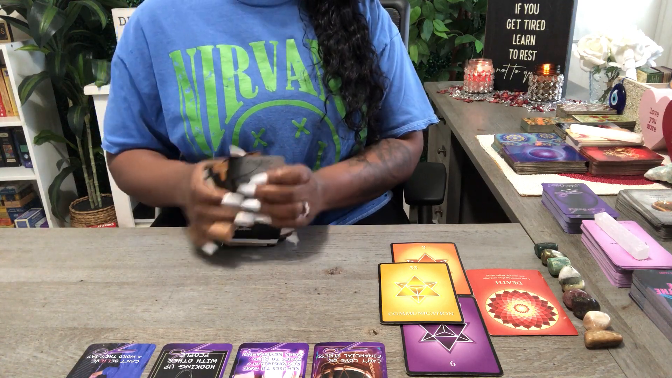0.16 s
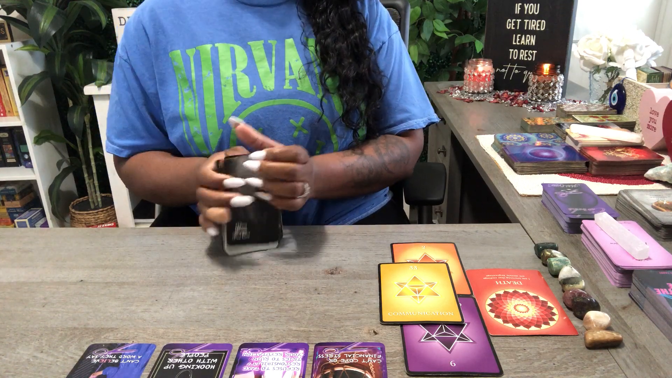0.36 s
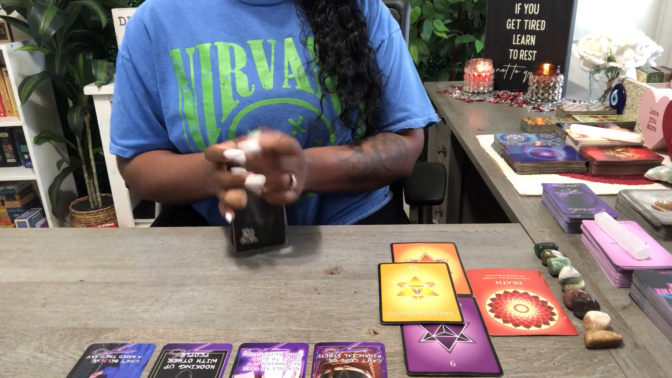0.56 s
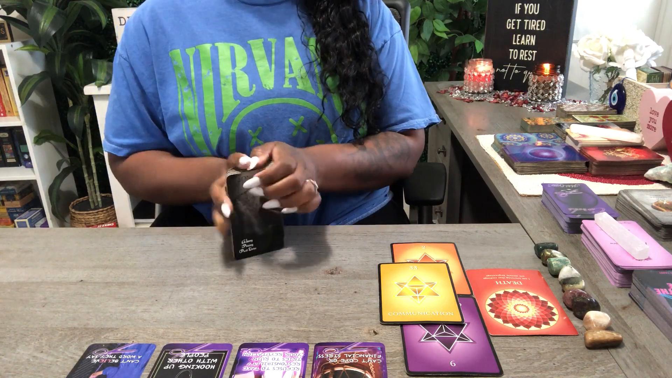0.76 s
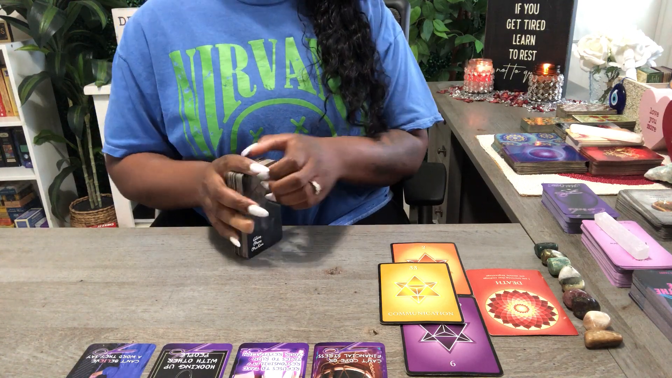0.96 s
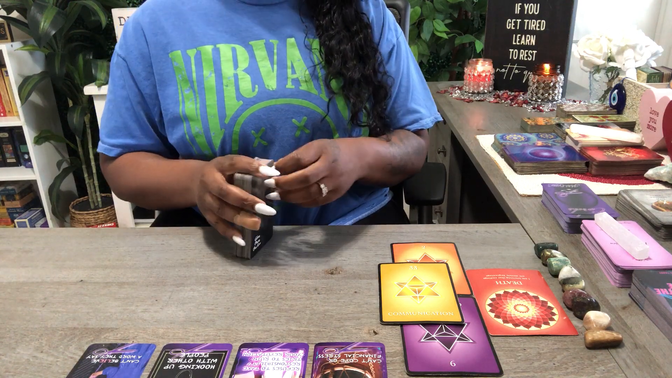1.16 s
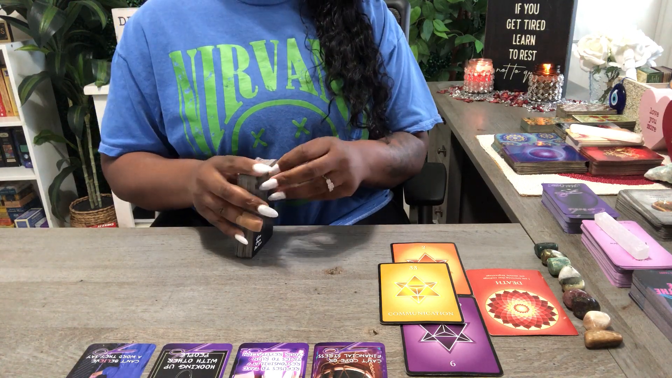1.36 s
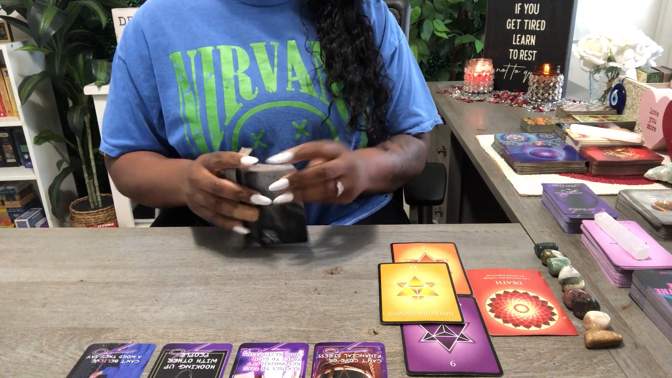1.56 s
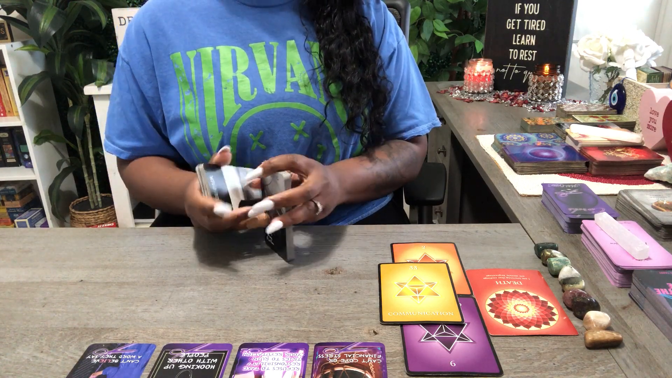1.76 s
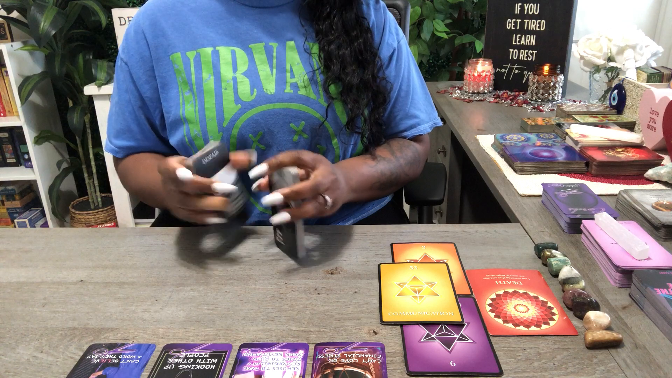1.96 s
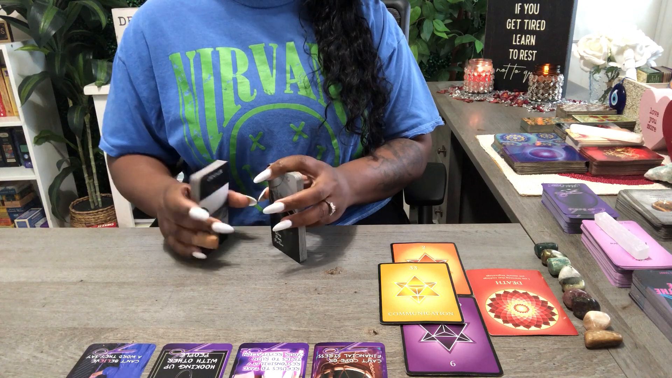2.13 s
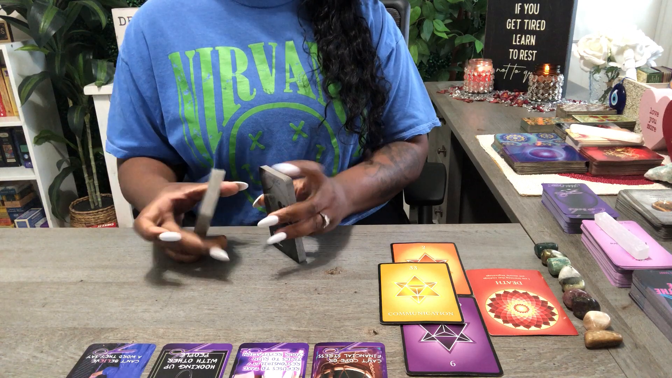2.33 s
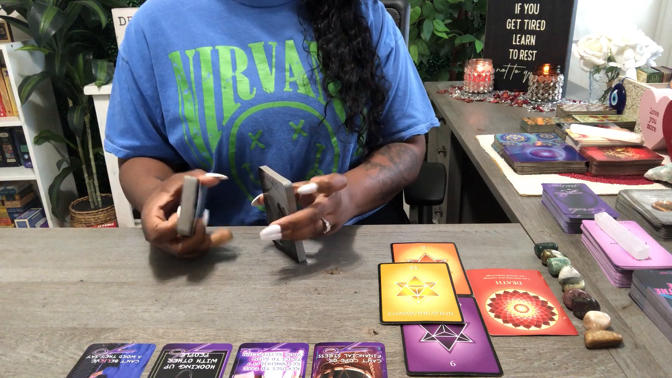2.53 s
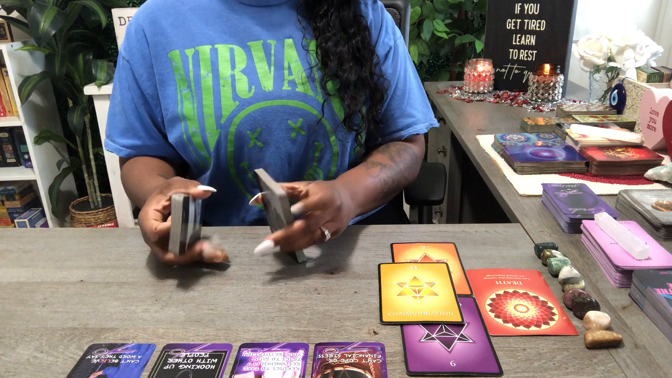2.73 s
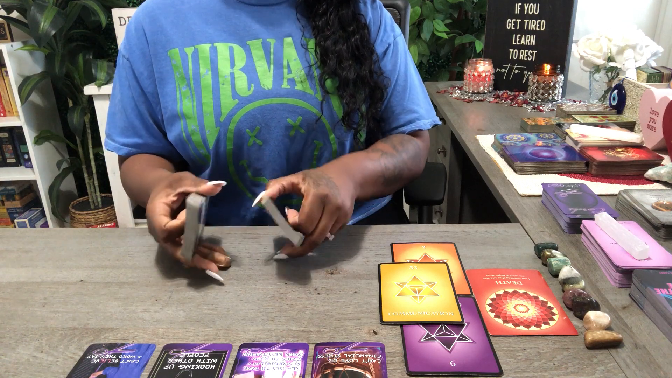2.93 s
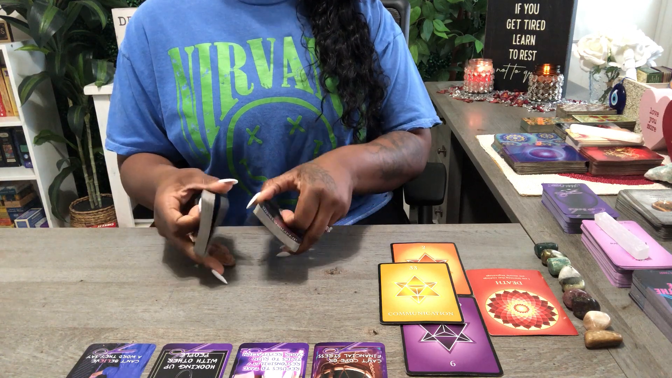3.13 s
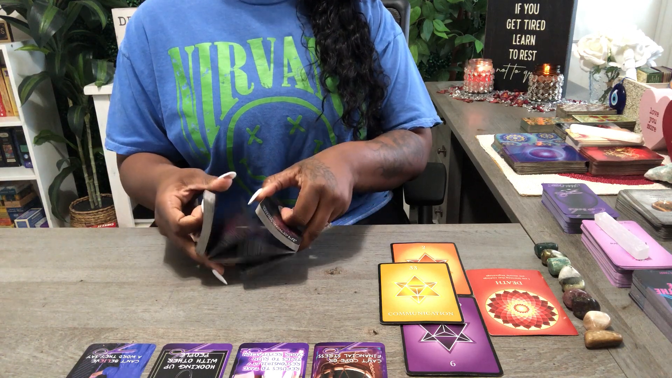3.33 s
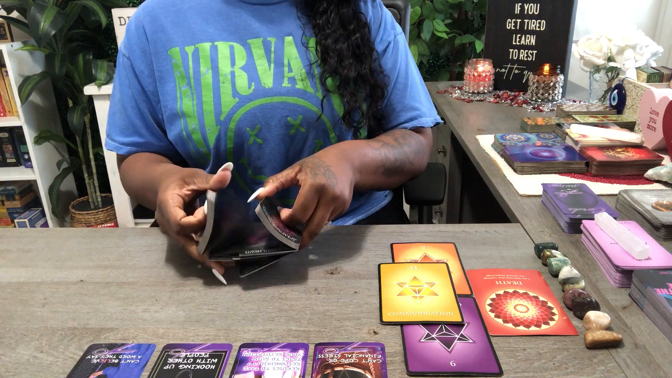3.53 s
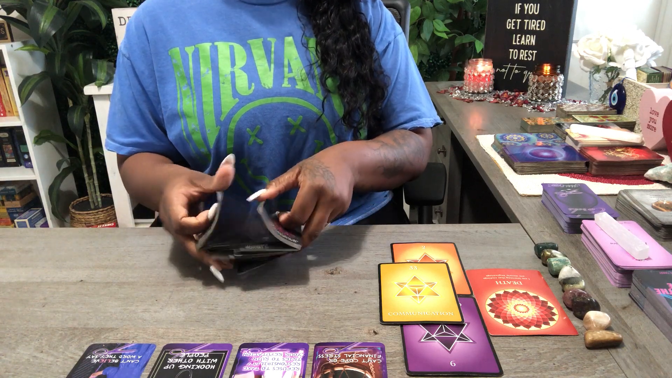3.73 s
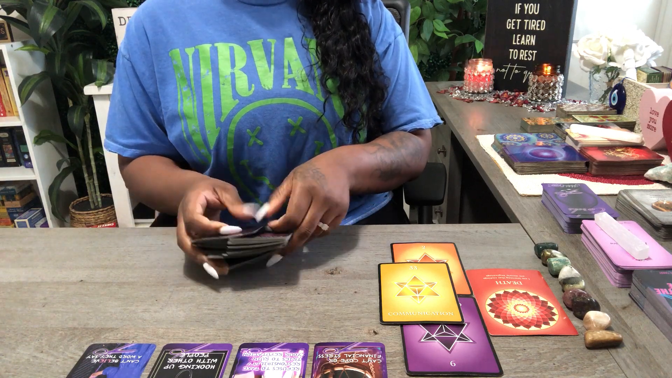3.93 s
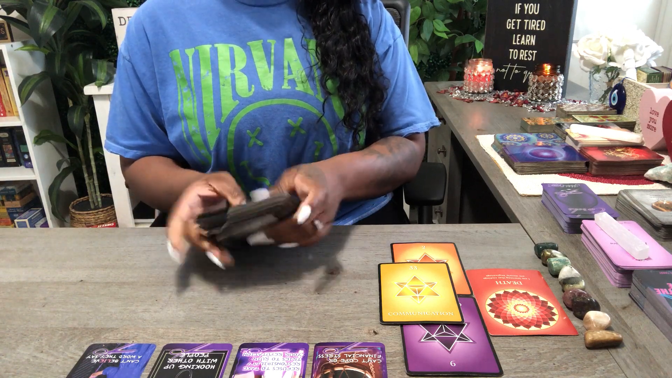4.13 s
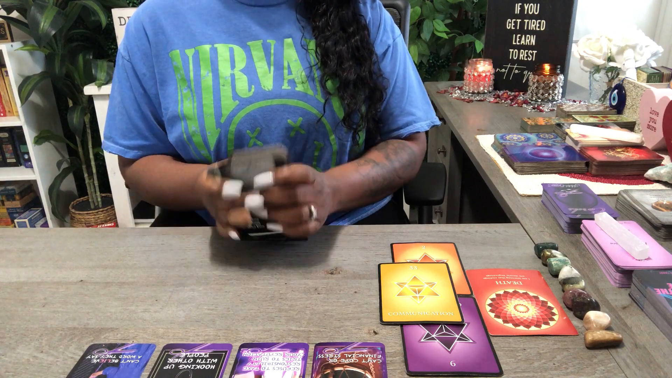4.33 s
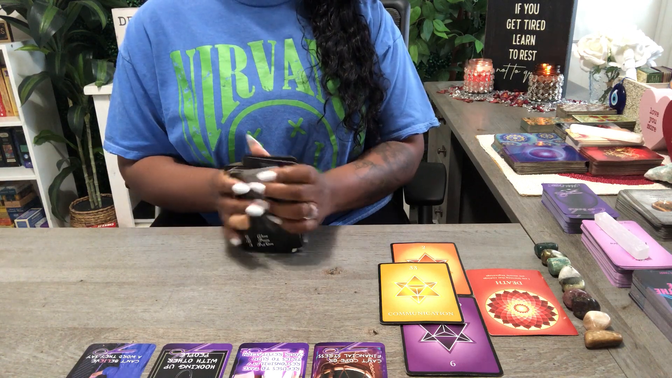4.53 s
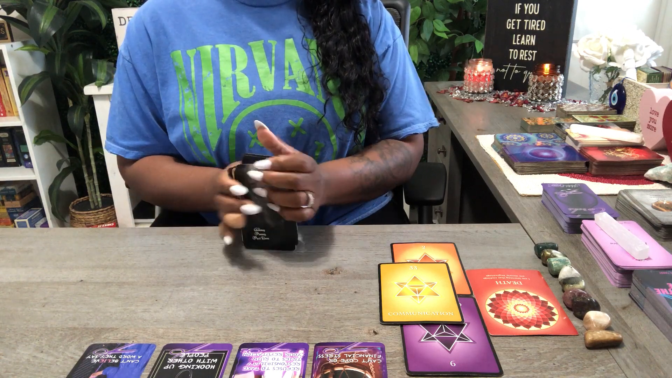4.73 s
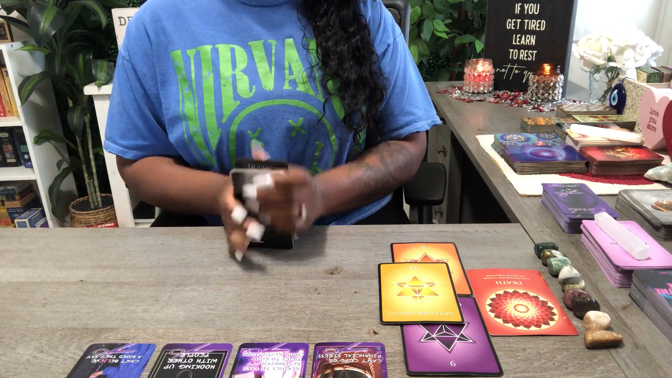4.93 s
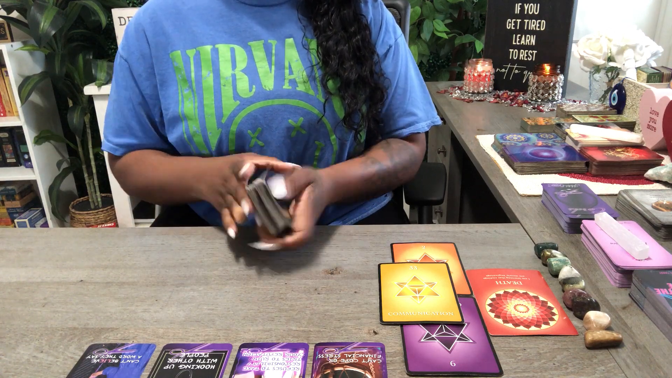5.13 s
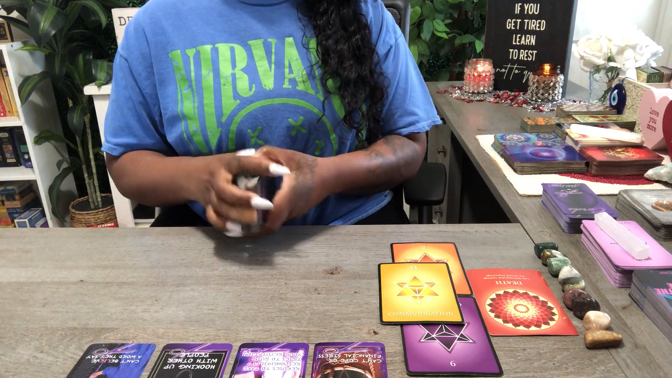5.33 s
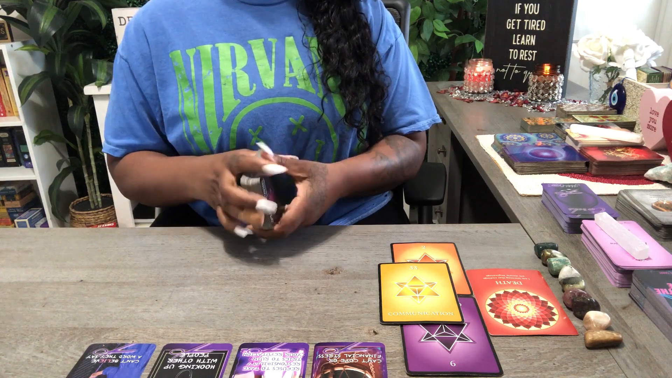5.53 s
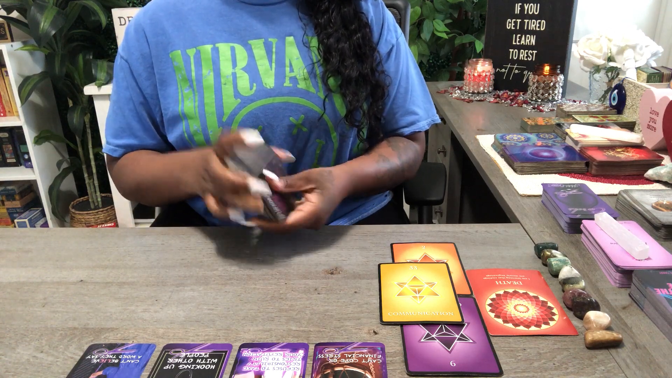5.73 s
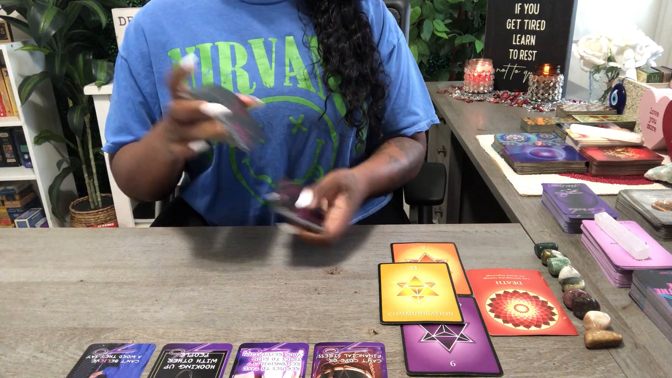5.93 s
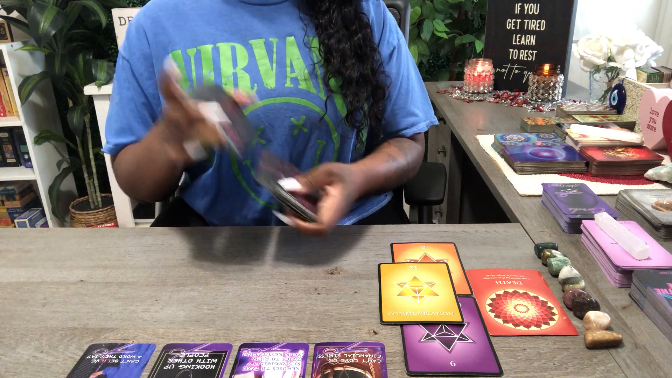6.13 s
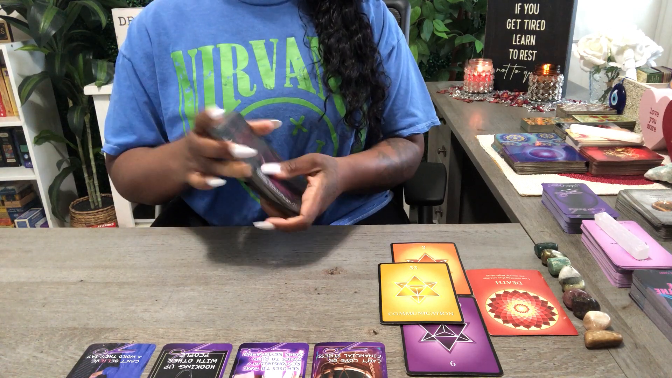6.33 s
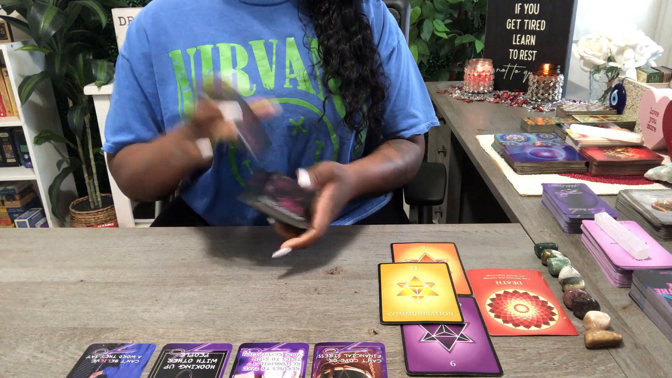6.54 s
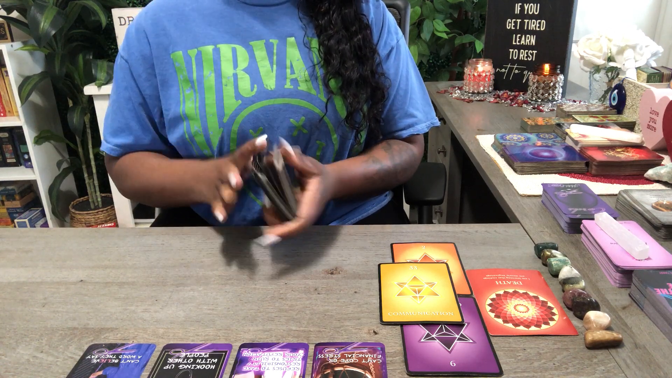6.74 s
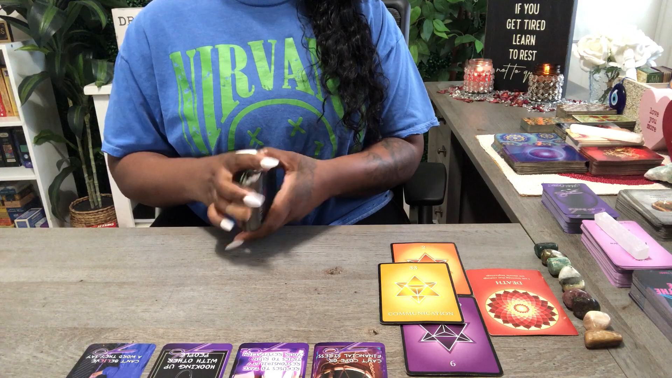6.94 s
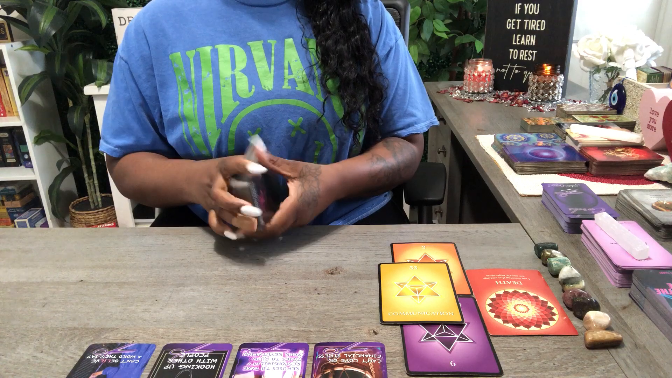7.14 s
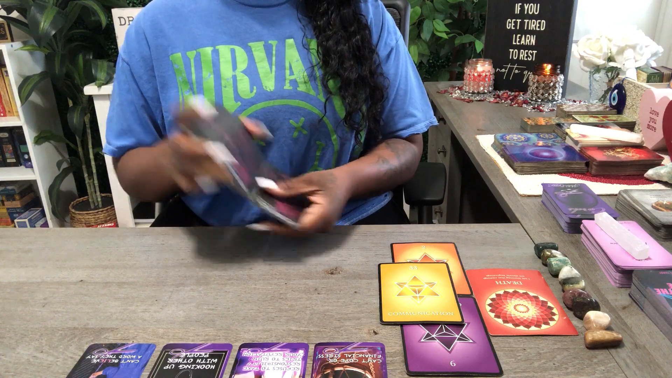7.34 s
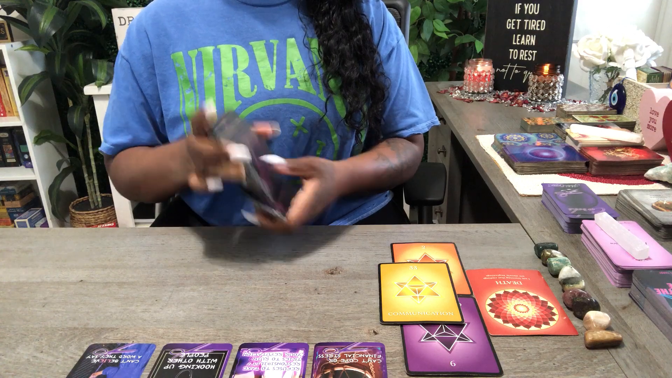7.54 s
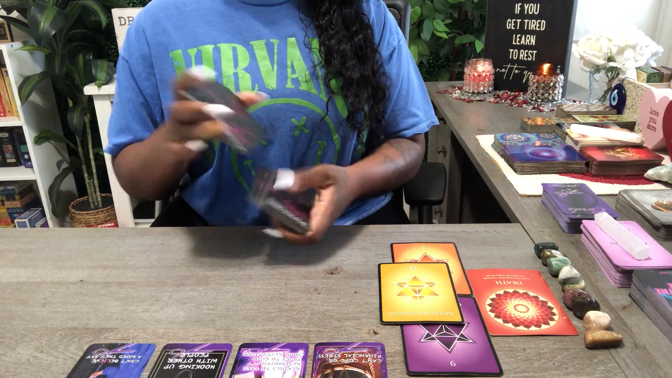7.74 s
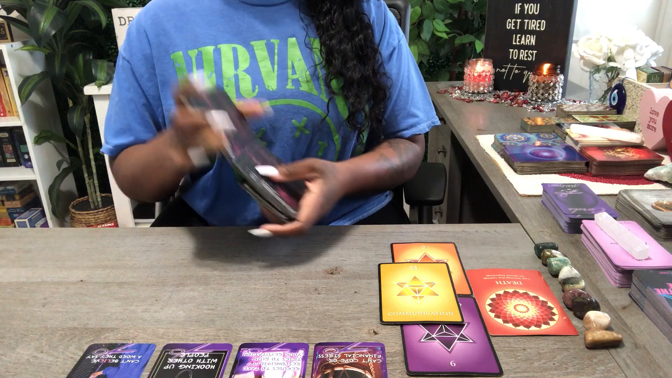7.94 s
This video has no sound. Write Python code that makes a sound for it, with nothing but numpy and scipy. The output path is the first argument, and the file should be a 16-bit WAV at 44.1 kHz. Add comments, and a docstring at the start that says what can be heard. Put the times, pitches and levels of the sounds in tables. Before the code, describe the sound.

A deck of large cards knocks sharply on a wooden table, riffles in a quickening purr, then shuffles overhand in a small room with faint hum.

```python
"""Over a soft rush of air and a faint hum, a deck of large cards is knocked square on a wooden table.
It is cut, riffled, squared again and shuffled overhand. Card edges clack, snap and thump the table top:
sharp blows with a noisy chatter, shaped by the resonances of stack and wood. Single cards flick and slap,
packets slide as grainy filtered noise, and trapped air pops as short decaying sines.
A small live room, made of decaying noise, answers the cards."""
import sys
import numpy as np
from scipy import signal
from scipy.fft import rfft, irfft, next_fast_len
from scipy.io import wavfile
from scipy.ndimage import uniform_filter1d, minimum_filter1d, map_coordinates

SR = 44100
rng = np.random.default_rng(int(sys.argv[2]) if len(sys.argv) > 2 else 0)


def generate_wav(signal):
    """Clip the signal to [-1, 1] and save it as 16-bit WAV at the path in sys.argv[1]."""
    frames = np.transpose(np.atleast_2d(signal))
    scaled = np.clip(frames, -1, 1) * 32767
    pcm = np.round(scaled).astype(np.int16)
    wavfile.write(sys.argv[1], SR, pcm)


N = 356769  # length in samples


def amp(db):
    """Decibels to gain."""
    return 10 ** (np.asarray(db) / 20)


def unit(x):
    """x at rms 1."""
    return x / np.sqrt(np.mean(x ** 2) + 1e-20)


def along(points, hz):
    """(Hz, value) points read on a log frequency axis."""
    f, v = np.transpose(points)
    return np.interp(np.log(hz + 1), np.log(f + 1), v)


def fade(t, t60):
    """A decay of 60 dB in t60 seconds."""
    return np.exp(-np.log(1000) * t / np.maximum(t60, 1e-4))


def wobble(rate, size):
    """A smooth random curve, rate knots a second."""
    knots = rng.standard_normal(int(size * rate / SR) + 4)
    return map_coordinates(knots, [np.arange(size) * rate / SR])


def coloured(x, colour):
    """x through a causal, minimum-phase filter with the given spectrum."""
    size = 2 * next_fast_len(len(x) // 2 + 2048)
    spectrum = amp(along(colour, np.fft.rfftfreq(size, 1 / SR)))
    # folding the cepstrum onto positive time makes the filter minimum-phase
    cepstrum = irfft(np.log(spectrum))
    cepstrum[1:size // 2] *= 2
    cepstrum[size // 2 + 1:] = 0
    return irfft(rfft(x, size) * np.exp(rfft(cepstrum)))[:len(x)]


def resonant(colour, modes):
    """A colour lifted around each (Hz, half width Hz, dB) resonance."""
    hz = np.geomspace(60, SR / 2, 500)
    lift = sum(db / (1 + ((hz - centre) / width) ** 2) for centre, width, db in modes)
    return np.column_stack([hz, along(colour, hz) + lift])


def softened(colour, corner_hz):
    """A soft contact passes little above its corner."""
    hz, db = np.transpose(colour)
    return np.column_stack([hz, db - 10 * np.log10(1 + (hz / corner_hz) ** 6)])


def add(track, s, sound):
    """Mix a sound into the track from time s."""
    start = int(np.clip(round(s * SR), 0, N - 1))
    track[start:start + len(sound)] += sound[:N - start]


# spectrum of the air rush: band_hz, relative_level_db
AIR_COLOUR = [(20, -8.5), (60, -1), (100, -4), (160, -7), (220, -12.5), (280, -10), (450, -8), (700, -12),
              (1500, -14), (2500, -21), (4000, -27.5), (8000, -38.5), (16000, -46.5)]
# steady hum lines: pitch_hz, level_db (rms, around which each line wavers)
HUM_LINES = [(119, -55), (179, -60), (269.5, -60.5), (360, -62.5), (448, -67.5)]


def background():
    """Filtered noise makes a steady rush of air; sines wavering in level and phase make the hum."""
    t = np.arange(N) / SR
    air = amp(-51.5) * unit(coloured(rng.standard_normal(N), AIR_COLOUR))
    hum = np.zeros(N)
    for hz, db in HUM_LINES:
        level = amp(db + 0.41 * wobble(7, size=N))
        phase = 2 * np.pi * hz * t + 0.5 * wobble(6.3, size=N)
        hum += level * np.sin(phase)
    return air + np.sqrt(2) * hum  # a sine's peak is sqrt(2) times its rms


# decay of the room in each band, before the early lift: band_hz, t60_s
ROOM_DECAY = [(80, 0.34), (210, 0.73), (560, 0.356), (1470, 0.5596), (3880, 0.47), (7000, 0.47),
              (14000, 0.31)]


def room_tail(wet_db, gap_s=0.0028, early_db=3, early_t60=0.245):
    """The room's answer: near surfaces come first, then each band dies at its own speed."""
    hz, t, bands = signal.stft(rng.standard_normal(SR * 2 // 3), SR, nperseg=256)
    decay = fade(t, along(ROOM_DECAY, hz)[:, None])
    tail = signal.istft(bands * decay, SR, nperseg=256)[1]
    t = np.arange(len(tail)) / SR
    onset = 1 - np.exp(-(t / gap_s) ** 2)
    tail *= onset * amp(early_db * fade(t, early_t60))
    return amp(wet_db) * tail / np.linalg.norm(tail)


def in_room(x, wet_db):
    """x followed by its own room tail."""
    response = room_tail(wet_db)
    response[0] += 1
    return signal.fftconvolve(x, response)


def contact(colour, t60, chatter_db, wet_db):
    """One sharp blow, the chatter of other cards landing, then the room; the direct part carries 1 ms at level 1."""
    tail = room_tail(wet_db)
    t = np.arange(len(tail)) / SR
    first_50_ms = slice(SR // 20)
    impulse = (t == 0).astype(float)
    chatter = rng.standard_normal(len(t)) * fade(t, t60) * (1 - np.exp(-t / 0.00064))
    force = impulse + amp(chatter_db) * chatter / np.linalg.norm(chatter)
    direct = coloured(force[first_50_ms], colour)
    # the tail is levelled by the colour of a bare impulse
    sound = coloured(tail, colour) / np.linalg.norm(coloured(impulse[first_50_ms], colour))
    sound[:len(direct)] += direct / np.linalg.norm(direct)
    return sound * np.sqrt(SR / 1000)


# spectrum of the stack's clack: band_hz, relative_level_db
CLACK_COLOUR = [(100, 0.5), (300, -2.5), (400, -2.5), (540, 3), (700, -0.5), (1000, 2), (1550, 1.5),
                (2600, -4.5), (3500, -7.5), (5000, -35), (8000, -24.5), (16000, -36)]
# spectrum of the edge snap: multiple of the edge pitch (ratio), relative_level_db
EDGE_COLOUR = [(.07, -33.5), (.3, -3), (0.549, 1), (.75, 4), (1, 0), (1.13, -10), (1.3, -10.5), (1.55, -26),
               (1.75, -23), (2.6, -35.5), (3.6, -48.5), (7, -62)]
# upper resonances of the table top: pitch_hz, half_width_hz, lift_db
WOOD_MODES = [(363, 23.3, 3), (536, 12.2, 2.5), (587, 13.2, 5.5), (733, 25.2, 6.5), (987.7, 19.2, 6),
              (1206, 12, 5), (1500, 21, 5), (1670, 14, 5.5), (2294, 17.5, 7.5), (2564.3, 15.2, 11.5),
              (2730, 14.5, 6.5), (2990, 14.6, 7.5), (3160, 10, 4.5), (4150, 17.5, 8.5)]
# low table top modes, each blow scattering pitch and level around them: pitch_hz, level_db, t60_s
TABLE_MODES = [(118, -12, 0.31), (140, -5, 0.313), (164.3, 1.5, 0.23), (74.8, -22, 0.103)]


def blow(clack_db, stack_hz, snap_db, edge_hz, thump_db):
    """Cards meet the table: the stack clacks, stiff edges snap and the table top booms."""
    stack = resonant(CLACK_COLOUR, [*WOOD_MODES, (stack_hz, 0.24 * stack_hz, 6)])
    stack = softened(stack, 1.37 * edge_hz)
    clack = amp(clack_db) * contact(stack, t60=0.014, chatter_db=5.5, wet_db=2.5)
    edge = resonant([(multiple * edge_hz, db) for multiple, db in EDGE_COLOUR], WOOD_MODES)
    snap = amp(snap_db) * contact(edge, t60=0.0097, chatter_db=-0.5, wet_db=-4.0)
    t = np.arange(len(clack)) / SR
    top = np.zeros(len(t))
    # the deck lands on a new spot each time, so the modes share the blow differently
    for hz, db, t60 in TABLE_MODES:
        level = amp(db + rng.normal(0, 2.4))
        pitch_hz = hz * rng.normal(1, 0.0239)
        top += level * fade(t, t60) * np.sin(2 * np.pi * pitch_hz * t)
    thump = amp(thump_db) * top * (1 - np.exp(-t / 0.00685))
    return clack + snap + thump


# single contacts with the table, light touches just before a tap and separate knocks:
# start_s, clack_db, stack_hz (pitch of the stack), snap_db, edge_hz
SINGLE_KNOCKS = [(0.06, -32, 1210, -40, 4340), (0.381, -35.5, 1450, -38, 3800),
                 (0.429, -20, 2580, -21, 5010), (0.457, -29.5, 2200, -25.5, 3970),
                 (0.6425, -18, 2500, -10, 5030), (0.813, -30, 2300, -22.5, 4750),
                 (1.187, -36.5, 1385, -46.5, 3670), (2.0999, -9.5, 2900, -12.5, 6506),
                 (4.402, -41.5, 1320, -44.5, 3000), (4.478, -35, 1300, -48.5, 3000),
                 (4.501, -33.5, 1250, -51, 2300), (4.564, -17.5, 2130, -15.5, 5020),
                 (4.616, -26.5, 1460, -27.5, 5550), (4.707, -36.5, 1500, -25, 4660),
                 (4.717, -28, 1410, -21.5, 5910), (4.842, -30, 1040, -31, 4470),
                 (4.961, -30, 1324, -19, 4600), (5.019, -33.5, 1500, -41, 4150)]
THUMP_DB = -20.5  # table thump of a single blow against its clack


def knocks():
    """Single blows: the harder the clack, the more the table thumps."""
    out = np.zeros(N)
    for s, clack_db, stack_hz, snap_db, edge_hz in SINGLE_KNOCKS:
        add(out, s, blow(clack_db, stack_hz, snap_db, edge_hz, clack_db + THUMP_DB))
    return out


# the deck is tapped on the table, first on a corner: start_s, clack_db, stack_hz, snap_db, corner_hz, thump_db,
# then flat: rock_s (time until flat), flat_db (clack), flat_hz (stack pitch), flat_snap_db,
# and in between: bounce_db (against the flat landing)
DECK_TAPS = [(0.0666, -26, 1000, -34, 2680, -42, 0.0312, -22, 850, -18, -4),
             (0.391, -24.5, 2270, -15, 4700, -43.5, 0.023, -17.5, 1620, -22.5, -6),
             (0.639, -10.5, 2540, -8, 3950, -25.5, 0.03, -27.5, 2560, -15, 2.5),
             (1.638, -18, 524, -29.5, 1720, -22.5, 0.029, -22, 1600, -18, 3),
             (2.044, -18.5, 887, -18.5, 2170, -23.5, 0.03, -19, 2820, -14, -29),
             (2.0967, -8, 2900, -21, 3280, -18, 0.0115, -12, 2036, -15.5, -13),
             (4.518, -24.5, 1190, -23.5, 3370, -41, 0.0272, -21, 1580, -14.5, -3),
             (4.73, -20, 1110, -18.5, 4500, -41, 0.0287, -23, 754, -17, -6)]
# the bounce: share of the time until flat, snap against the flat snap, edge pitch, thump against the clack
BOUNCE_AT, BOUNCE_SNAP_DB, BOUNCE_EDGE_HZ, BOUNCE_THUMP_DB = 0.66, -6, 4700, -20
# landing on the whole edge: edge pitch, thump against the clack
FLAT_EDGE_HZ, FLAT_THUMP_DB = 4800, -13.5


def taps():
    """One corner lands, the deck bounces once and falls flat onto its whole edge."""
    out = np.zeros(N)
    for (s, clack_db, stack_hz, snap_db, corner_hz, thump_db,
         rock_s, flat_db, flat_hz, flat_snap_db, bounce_db) in DECK_TAPS:
        corner = blow(clack_db, stack_hz, snap_db, corner_hz, thump_db)
        bounce = blow(flat_db, flat_hz, flat_snap_db + BOUNCE_SNAP_DB,
                      BOUNCE_EDGE_HZ, flat_db + BOUNCE_THUMP_DB)
        flat = blow(flat_db, flat_hz, flat_snap_db, FLAT_EDGE_HZ, flat_db + FLAT_THUMP_DB)
        add(out, s, corner)
        add(out, s + BOUNCE_AT * rock_s, amp(bounce_db) * bounce)
        add(out, s + rock_s, flat)
    return out


# hands press on the table and jolt its frame: start_s, level_db, pitch_hz
HAND_BUMPS = [(4.47, -31.5, 61), (5.11, -39, 35)]
FRAME_DB, FRAME_HZ = -27, 42  # each tap swings the frame too: level against its thump, pitch


def bumps():
    """The table frame gives a few slow, damped swings under each tap or press."""
    out, t = np.zeros(N), np.arange(SR // 2) / SR
    envelope = fade(t, 0.18) * (1 - np.exp(-t / 0.0085))
    jolts = [(s, thump_db + FRAME_DB, FRAME_HZ) for s, _, _, _, _, thump_db, *_ in DECK_TAPS]
    for s, db, hz in [*HAND_BUMPS, *jolts]:
        add(out, s, amp(db) * np.sin(2 * np.pi * hz * t) * envelope)
    return out


# spectrum of a card's bright tick: band_hz, relative_level_db
FLICK_COLOUR = [(500, -34), (2000, 9), (4000, 9), (6500, 5.5), (9000, 2.5), (13000, -0.5), (16000, -7.5)]
# spectrum of a card slapping the pack: band_hz, relative_level_db
SLAP_COLOUR = [(100, -27), (250, -16), (450, -1), (1000, 4), (1600, 1), (3000, -4.5), (5000, -8),
               (9000, -26), (16000, -25.5)]


def flick(flick_db, slap_db, pack_hz):
    """A bent card lets go with a bright tick and slaps the cards below."""
    pack = resonant(SLAP_COLOUR, [(pack_hz, 0.155 * pack_hz, 6)])
    tick = amp(flick_db) * contact(FLICK_COLOUR, t60=0.016, chatter_db=-2, wet_db=0.0)
    slap = amp(slap_db) * contact(pack, t60=0.019, chatter_db=4.0, wet_db=2.0)
    return tick + slap


# a single card flicks off the thumb or a fingertip: start_s, flick_db, slap_db
CARD_FLICKS = [(0.172, -44.5, -42), (0.272, -42, -44.5), (0.858, -48, -42), (2.524, -52, -46),
               (2.785, -53, -46.5), (2.938, -48.5, -44), (3.334, -47.5, -41), (3.351, -39.5, -37),
               (3.409, -38, -37), (3.437, -34.5, -38.5), (3.504, -38, -38.5), (3.562, -32, -48),
               (3.629, -34.5, -33), (3.638, -31.5, -35.5), (3.679, -33.5, -34.5), (3.802, -28, -30),
               (3.845, -26, -34.5), (3.85, -15.5, -21.5), (3.8534, -23, -20.5), (6.153, -46, -33),
               (7.961, -41, -39)]
FLICK_PACK_HZ = 1600  # pitch of the pack that a single card hits
# overhand shuffle, a packet drops into the palm and slides home:
# start_s, flick_db, slap_db, pack_hz (pitch of the pack), slide_db (hiss of the slide)
PACKET_DROPS = [(6.093, -37.5, -29.5, 2200, -55), (6.3589, -24, -23, 850, -52),
                (6.6562, -32, -30.5, 1250, -55), (7.614, -37.5, -37, 905, -58.5),
                (7.701, -46, -33.5, 915, -74), (7.8886, -32.5, -29, 905, -64)]


def flicks():
    """Single cards and dropped packets each tick and slap."""
    out = np.zeros(N)
    for s, flick_db, slap_db in CARD_FLICKS:
        add(out, s, flick(flick_db, slap_db, FLICK_PACK_HZ))
    for s, flick_db, slap_db, pack_hz, _ in PACKET_DROPS:
        add(out, s, flick(flick_db, slap_db, pack_hz))
    return out


# spectrum of the bright card hiss: band_hz, relative_level_db
HISS_COLOUR = [(800, -16.5), (2500, 1.5), (4500, 2), (7000, 2), (10000, 0.5), (14000, -0.5), (16000, -7)]
# spectrum of the duller rub: band_hz, relative_level_db
RUB_COLOUR = [(100, -13), (400, -1), (1000, -5.5), (1800, -2.5), (3500, -4), (7000, -15.5), (16000, -46)]


def friction(speed, hiss_db, rub_db, pack_hz):
    """Card faces rub as loudly as they move; tiny catches make it grainy and the pack colours it."""
    size = len(speed)
    catches = unit(amp(5 * wobble(600, size=size)))
    hiss = amp(hiss_db) * unit(coloured(catches * rng.standard_normal(size), HISS_COLOUR))
    pack = resonant(RUB_COLOUR, [(pack_hz, 0.164 * pack_hz, 9)])
    rub = amp(rub_db) * unit(coloured(catches * rng.standard_normal(size), pack))
    return in_room(speed * (hiss + rub), wet_db=0.0)


# a packet is drawn out of the deck or pushed in:
# peak_s (fastest point), hiss_db, rub_db, pack_hz (pitch of the pack), half_length_s
PACKET_SLIDES = [(0.291, -55.5, -49.5, 750, 0.0212), (0.512, -54, -66, 1520, 0.016),
                 (0.917, -66, -55, 770, 0.028), (1.6, -70.5, -60.5, 1460, 0.054),
                 (3.843, -41.5, -43, 1150, 0.034), (4.078, -64.5, -61.5, 1206, 0.072),
                 (4.253, -63.5, -56, 1620, 0.026), (4.42, -69, -58, 1260, 0.0294),
                 (5.034, -67, -64.5, 1560, 0.04), (5.323, -59.5, -58, 790, 0.0195),
                 (5.857, -47.5, -65, 1230, 0.0213), (6.919, -61.5, -62, 1090, 0.066),
                 (7.378, -44.5, -50, 890, 0.023), (7.711, -50.5, -63, 900, 0.0173),
                 (8.005, -54.5, -61, 1630, 0.023)]
# sliding home: fastest point after the drop, half length, rub over hiss
HOME_AFTER_S, HOME_HALF_S, HOME_RUB_DB = 0.048, 0.0277, 8


def slides():
    """Friction swells and ebbs with each stroke; every dropped packet slides home just after it lands."""
    out, t = np.zeros(N), np.arange(-SR // 5, SR // 5) / SR
    home = [(s + HOME_AFTER_S, db, db + HOME_RUB_DB, pack_hz, HOME_HALF_S)
            for s, _, _, pack_hz, db in PACKET_DROPS]
    for peak_s, hiss_db, rub_db, pack_hz, half_s in [*PACKET_SLIDES, *home]:
        speed = 1 / np.cosh(np.clip(1.3 * t / half_s, -20, 20))
        add(out, peak_s + t[0], friction(speed, hiss_db, rub_db, pack_hz))
    return out


# the two halves run off the thumbs, unevenly and fastest at the end:
# time_s, rate (cards per s), level_db, hollow_hz (pitch of the gap between the halves)
RIFFLE_CURVE = [(3.30, 38, -56, 1690), (3.36, 35.55, -43, 1000), (3.471, 42.3, -47, 1600),
                (3.60, 34, -48.5, 944), (3.65, 80, -45, 1050), (3.70, 102, -33, 1400),
                (3.765, 70, -42.5, 1800), (3.82, 160, -34, 1300), (3.857, 260, -34.5, 1550)]
# the interleaving cards rub: levels against the riffle's, pitch of the pack
RIFFLE_HISS_DB, RIFFLE_RUB_DB, RIFFLE_PACK_HZ = -22, -16.5, 1000


def riffle():
    """Between the loud flicks the other cards tick past the thumbs and flap into the hollow between the halves."""
    out = np.zeros(N)
    s, rate, db, hollow_hz = np.transpose(RIFFLE_CURVE)
    t = np.arange(s[0], s[-1], 1 / SR)
    released = np.cumsum(np.interp(t, s, rate)) / SR  # cards let go so far
    scatter = rng.standard_normal((int(released[-1]), 2))
    for card, (late, size) in enumerate(scatter):
        when = np.interp(card + 0.35 * late, released, t)
        pitch = np.interp(when, s, hollow_hz)
        level = amp(np.interp(when, s, db) + 2.38 * size)
        tick = contact(FLICK_COLOUR, t60=0.0057, chatter_db=-3, wet_db=0)
        hollow = resonant(SLAP_COLOUR, [(pitch, 0.16 * pitch, 14)])
        flap = amp(-2.5) * contact(hollow, t60=0.0052, chatter_db=-6, wet_db=2)
        add(out, when, level * (tick + flap))
    rubbing = amp(np.interp(t, s, db))
    add(out, s[0], friction(rubbing, RIFFLE_HISS_DB, RIFFLE_RUB_DB, RIFFLE_PACK_HZ))
    return out


# resonances of trapped-air pops, several rows sounding together as one pop:
# start_s, level_db, pitch_hz, t60_s
POP_RESONANCES = [(3.834, -37, 291.6, 0.016), (3.851, -21, 424, 0.0175), (7.891, -36, 433, 0.038),
                  (7.8881, -23, 1301, 0.023), (7.889, -22, 1570, 0.022), (7.888, -22.5, 1805, 0.017)]


def pops():
    """Air squeezed out between two packets rings as short decaying sines, and the room holds their pitch."""
    out, t = np.zeros(N), np.arange(SR // 10) / SR
    for s, db, hz, t60 in POP_RESONANCES:
        ring = amp(db) * np.sin(2 * np.pi * hz * t) * fade(t, t60)
        add(out, s, in_room(ring, wet_db=3))
    return out


def scene():
    """All the sources summed into one channel."""
    table = knocks() + taps() + bumps()
    cards = flicks() + slides() + riffle() + pops()
    return (background() + table + cards)[None]


TOP_HZ = 16100  # band limit


def record(dry):
    """A fast limiter holds down the hardest knocks; nothing is kept above the band limit."""
    needed = np.minimum(1, 0.64 / (np.abs(dry) + 1e-9))
    # 89 samples is about 2 ms, centred so the gain dips just before each peak
    gain = uniform_filter1d(minimum_filter1d(needed, size=89), size=89)
    size = next_fast_len(N + SR // 2)
    kept = np.fft.rfftfreq(size, 1 / SR) < TOP_HZ
    return irfft(rfft(dry * gain, size) * kept, size)[:, :N]


dry = scene()
out = record(dry)
generate_wav(out)
```